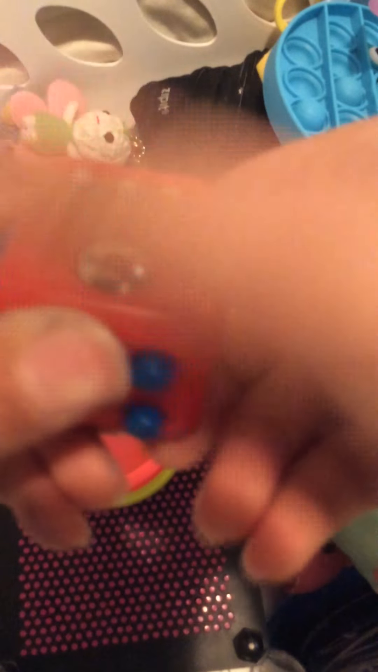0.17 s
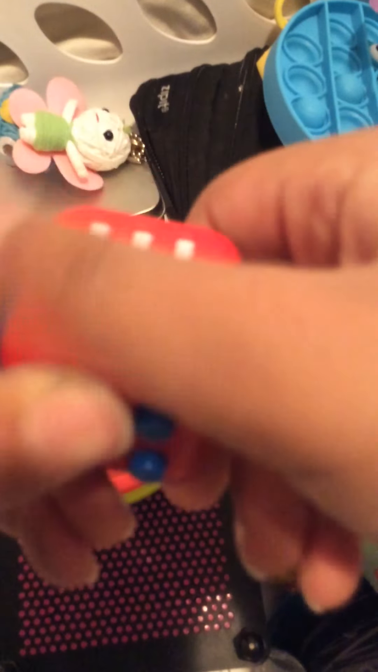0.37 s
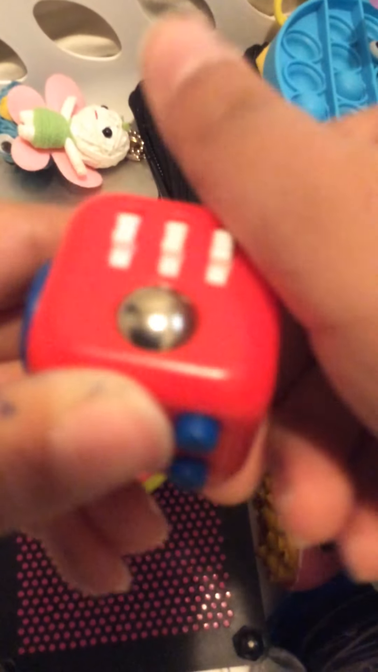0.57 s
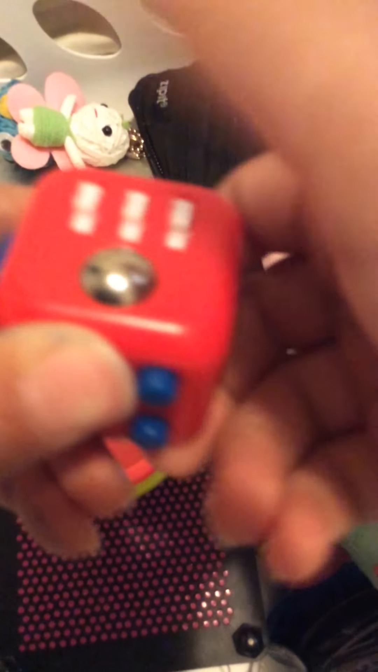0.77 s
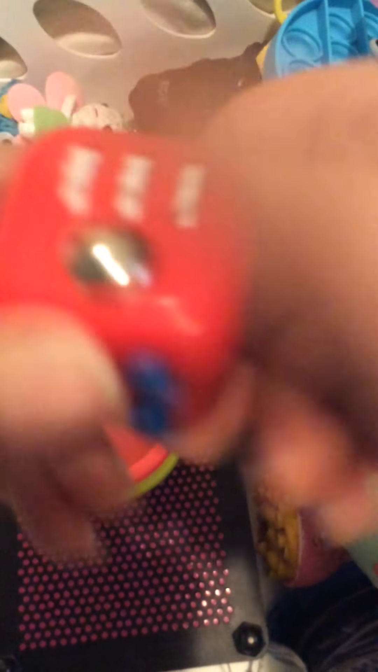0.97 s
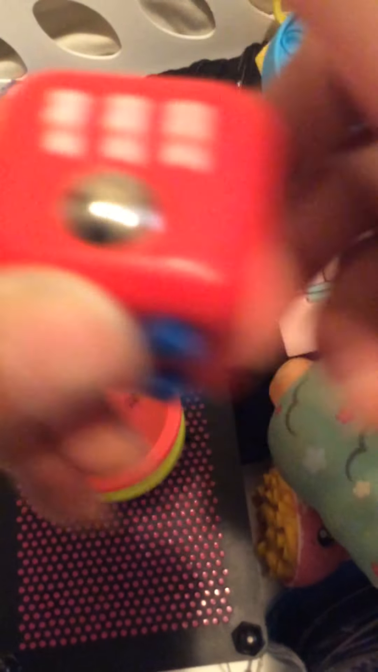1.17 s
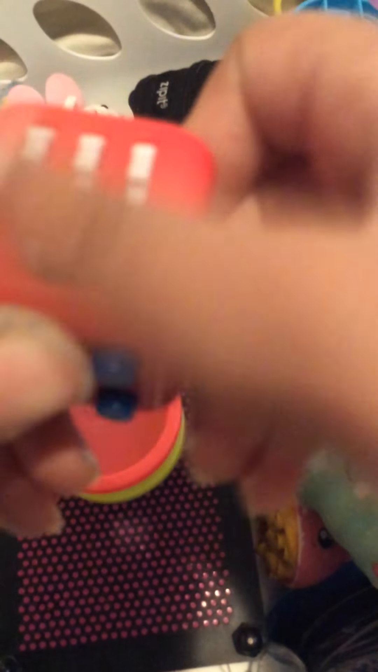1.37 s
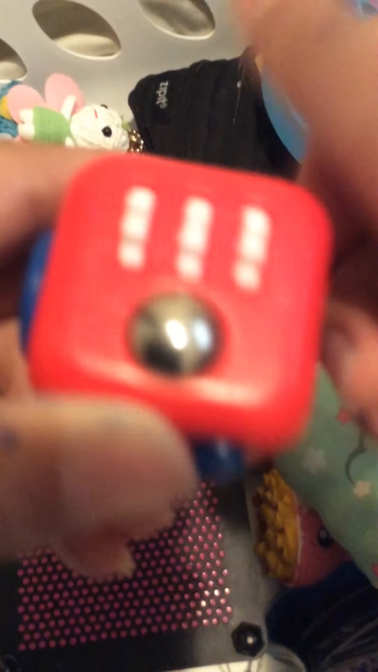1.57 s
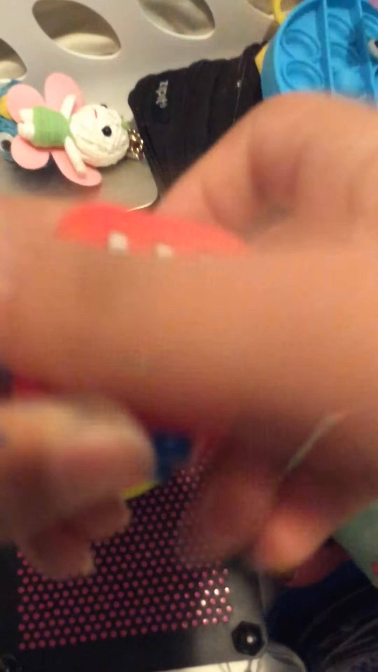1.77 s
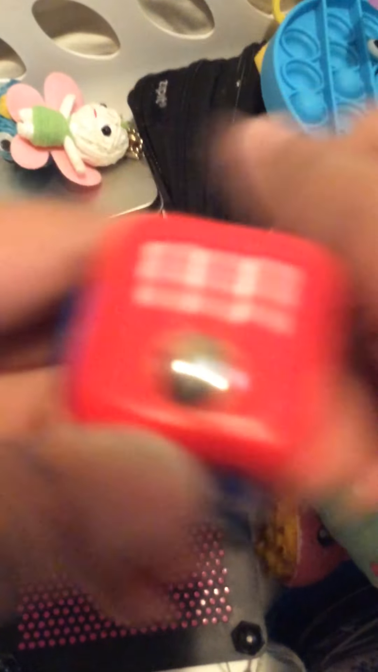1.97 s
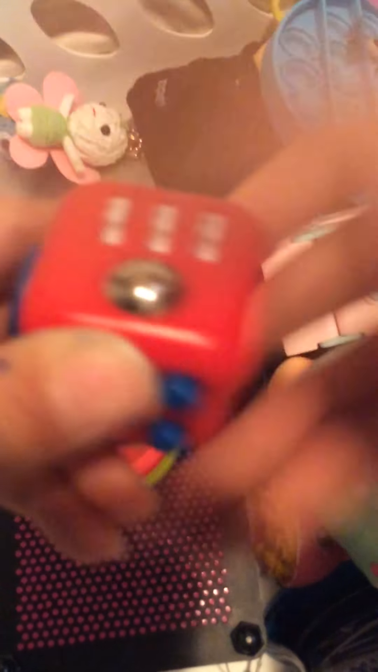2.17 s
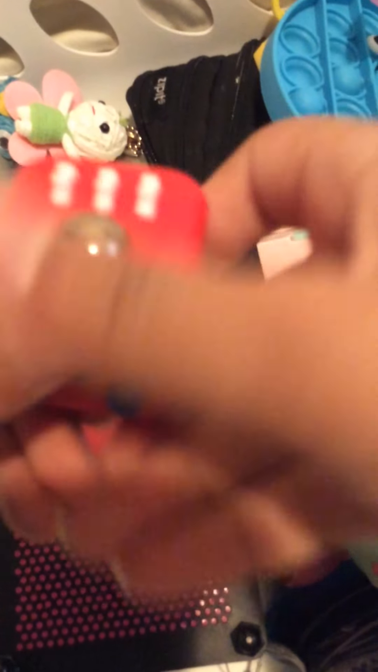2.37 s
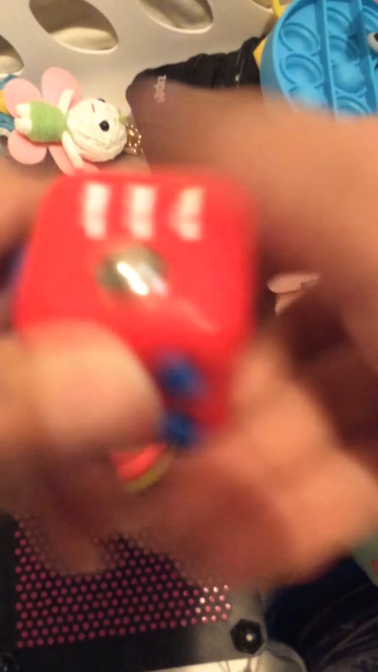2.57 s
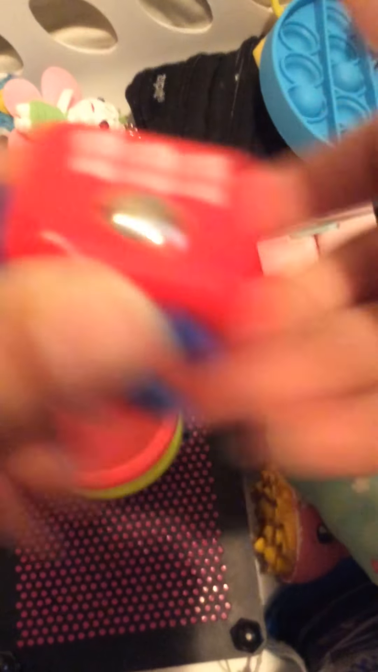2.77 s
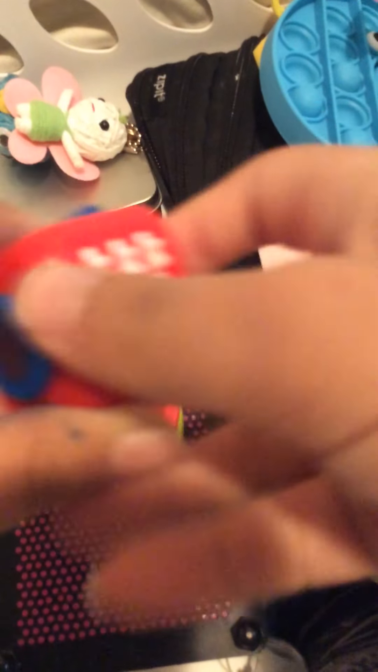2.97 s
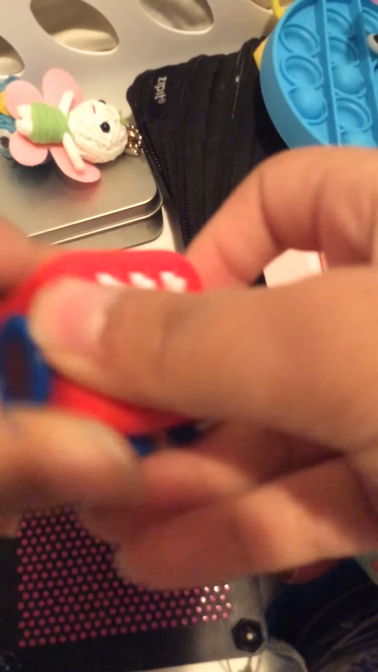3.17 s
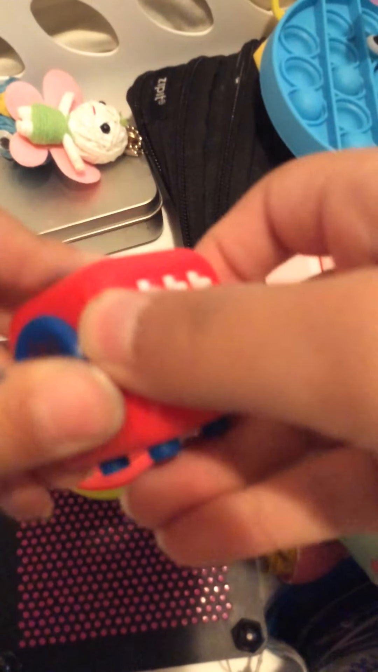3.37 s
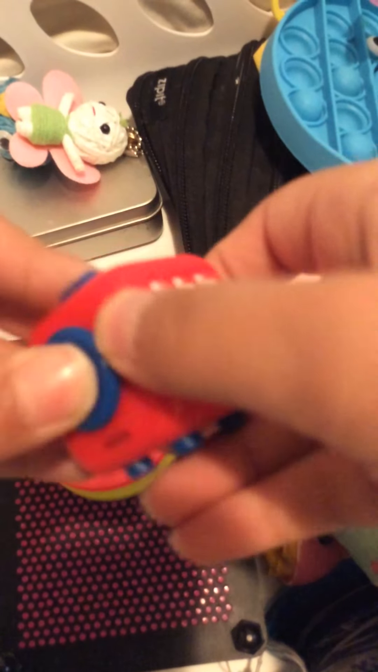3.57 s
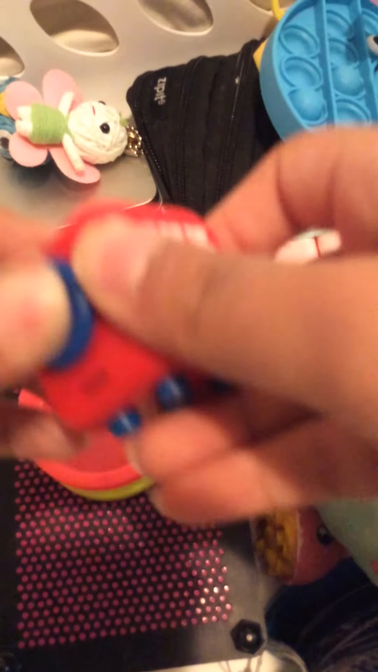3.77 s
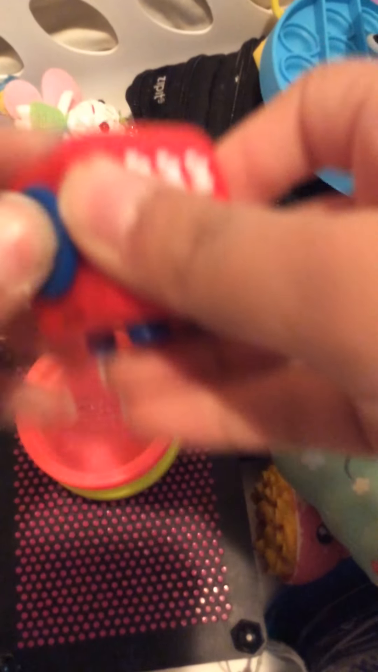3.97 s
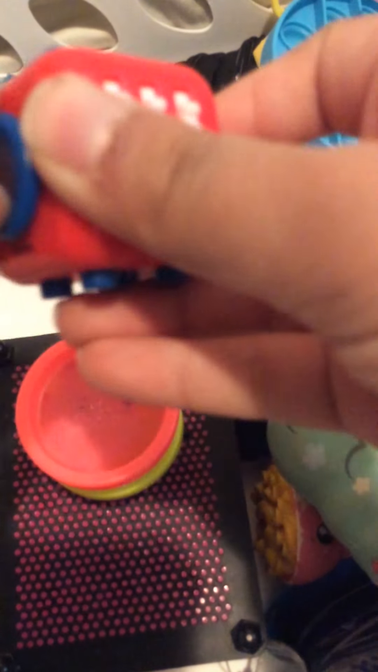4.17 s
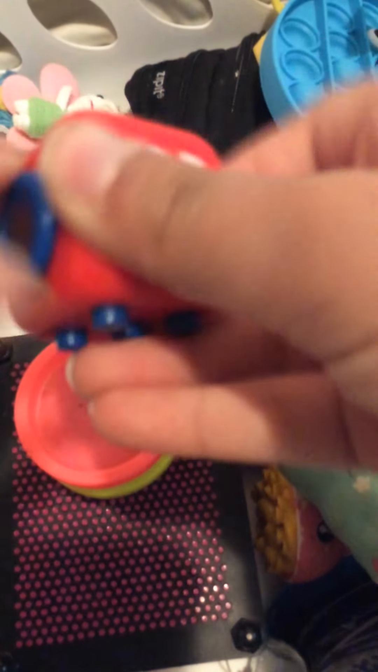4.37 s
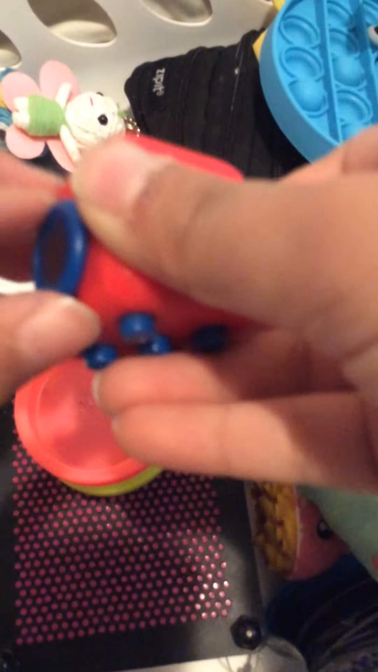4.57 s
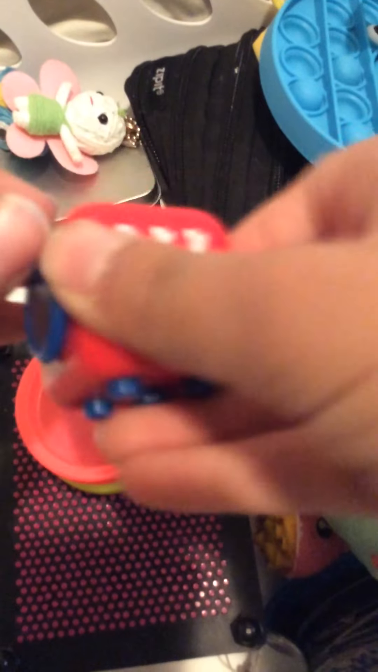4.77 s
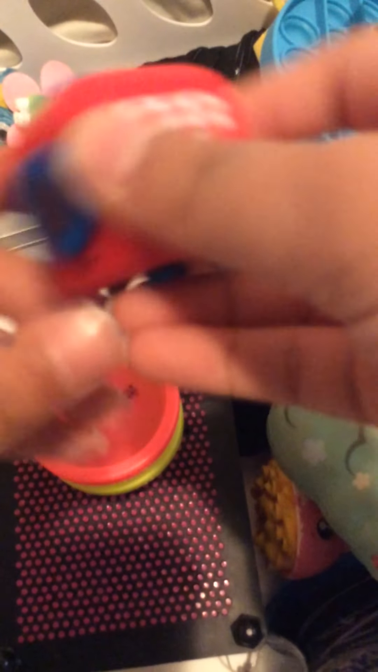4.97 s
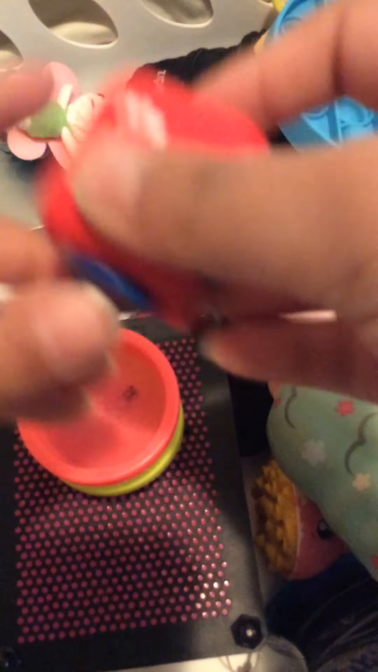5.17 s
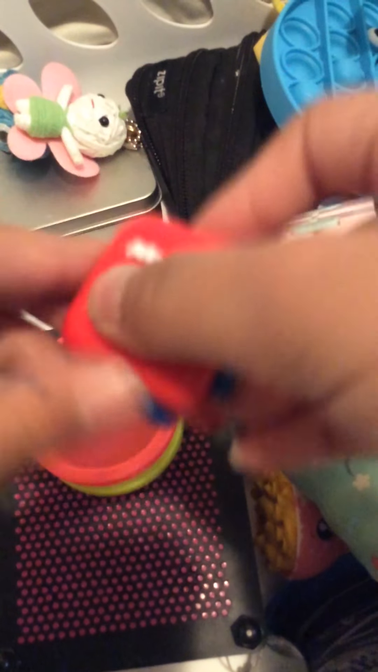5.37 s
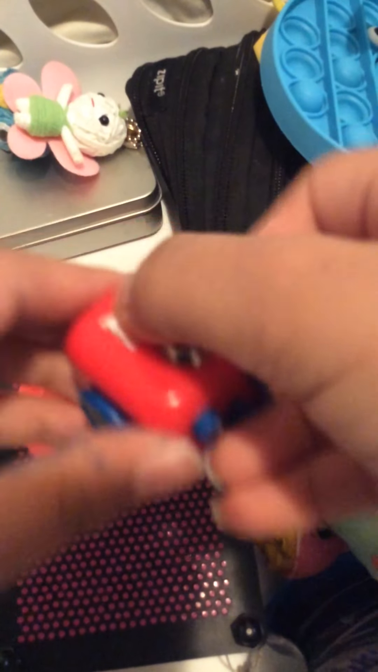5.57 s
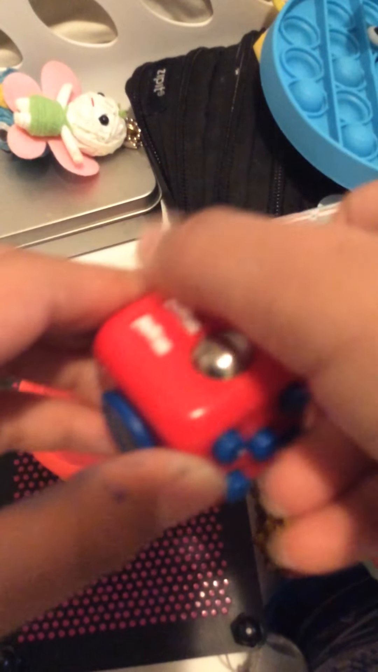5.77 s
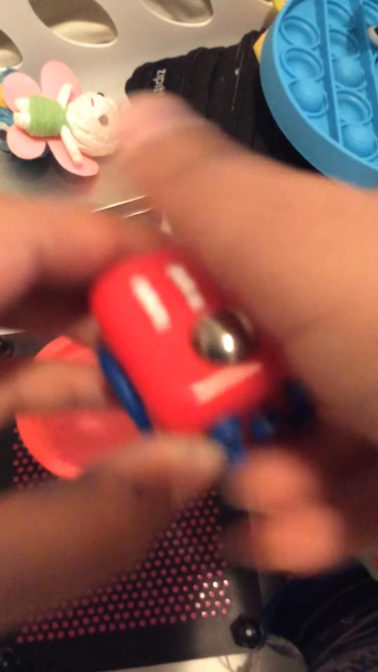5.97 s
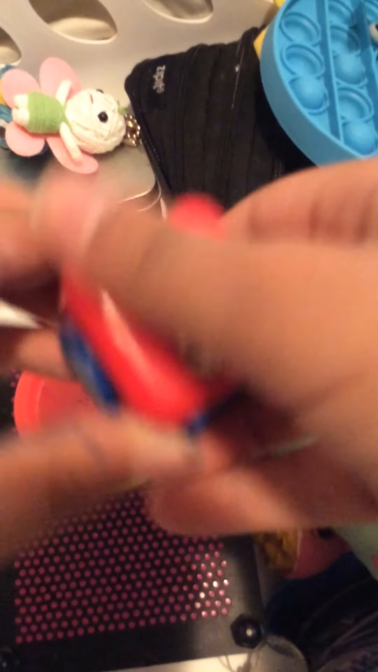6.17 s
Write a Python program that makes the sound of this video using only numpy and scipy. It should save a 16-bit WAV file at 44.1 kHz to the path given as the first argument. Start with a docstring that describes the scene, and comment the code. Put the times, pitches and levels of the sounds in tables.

```python
"""Fingers work a small hollow plastic cube with gears, a ball and buttons, close to a phone.
First a thumb sweeps the gears in loud ratchet bursts: runs of tiny contacts ring the cube's modes.
Then buttons and loose parts tick and rattle, mostly softer; fingertip knocks push the case throughout.
Behind it all lie the cube's faint room tail, shaped air noise and a low machine hum of noise bands
and a throbbing line."""
import sys
import numpy as np
from scipy import signal
from scipy.fft import rfft, irfft
from scipy.io import wavfile
from scipy.ndimage import uniform_filter1d

SR = 44100
rng = np.random.default_rng(int(sys.argv[2]) if len(sys.argv) > 2 else 0)


def to_wav(s):
    """Save 16-bit WAV."""
    ch = np.atleast_2d(s).T  # columns
    pcm = np.round(np.clip(ch, -1, 1) * 32767)  # PCM
    wavfile.write(sys.argv[1], SR, pcm.astype(np.int16))


N = 274743


def gain_of(db):
    """Decibels to amplitude gain."""
    return 10 ** (np.asarray(db) / 20)


def evened(x):
    """Scales to rms 1."""
    return x / np.sqrt(np.mean(x ** 2) + 1e-20)


def read(points, hz):
    """Interpolates (Hz, value) points on a log-frequency axis."""
    point_hz, value = np.transpose(points)
    return np.interp(np.log(hz + 1), np.log(point_hz + 1), value)


def add(mix, start_s, sound):
    """Mixes a sound in at start_s, cut at the end of the mix."""
    part = mix[max(round(start_s * SR), 0):][:len(sound)]
    part += sound[:len(part)]


def ring(part, at_s, size=768, spread_db=3, pitch_spread=.045):
    """A part's decaying modes after a tap; each tap lands elsewhere, so strength and pitch vary."""
    # Modes of the cube by part. Each row: frequency in Hz, relative level in dB, t60 in seconds.
    cube_modes = {"edges": [(7155, -4, .004), (8237, 1.5, .006), (8994, 2, .004), (10360, 1.5, 0.0034),
                  (10450, -4, 0.0046), (11870, -1.5, .004), (13700, -10.5, 0.0053), (13900, -8, 0.0018)],
                  "walls": [(3560, 0, 0.0014), (4496, 10, 0.01), (5373, 16, .008), (5648, -10, 0.0026)],
                  "cavity": [(1780, -8.5, 0.013), (1936, 2, 0.02), (2220, -3.5, 0.0036),
                  (2920, -6.5, 0.0046)], "case": [(407, -5, 0.0014), (780, 5.5, 0.012), (1030, 0, 0.032),
                  (1570, 2.5, 0.021)]}
    # The grip frees a wall mode once the cube is turned. Each row: time in seconds, boost in dB.
    grip = [(2.9, -4.5), (3.1, 2.5), (5.7, 9.5)]
    hz, db, t60_s = np.transpose(cube_modes[part])[:, :, None]
    level_chance, pitch_chance = rng.standard_normal((2, len(hz), 1))
    t = np.arange(size) / SR
    db = db + spread_db * level_chance
    if part == "walls":
        db[1] += np.interp(at_s, *np.transpose(grip))
    mode_hz = hz * (1 + pitch_spread * pitch_chance)
    decay = gain_of(db - 60 * t / np.maximum(t60_s, .001))
    modes = (decay * np.sin(2 * np.pi * mode_hz * t)).sum(0)
    # so small a body sends out little below its lowest mode
    highpass = signal.butter(4, .75 * hz.min(), "high", fs=SR, output="sos")
    return signal.sosfilt(highpass, modes)


def clicks(contacts_per_s=9000, swell_ms=3.2, swell_db=30, chatter_fall_db=11, snap=1.3):
    """A faint swell leads into each click; then it snaps and chatters in a dying run of tiny contacts that ring
    every part."""
    # Each row: crest in seconds, level of the bright edges in dB, cavity re edges in dB,
    # chatter in ms (time to fall by chatter_fall_db).
    click_rows = [(.01, -37.5, -21, 1.3), (.0344, -33, -17.5, 6.9), (.0392, -39.5, -14.5, 0.63),
                  (0.0474, -50, -11, 0.82), (.184, -42, -46, 1.1), (0.1912, -49.5, -12.5, 3.5),
                  (0.3233, -50.5, 1, 14), (.3936, -59.5, 7.5, 1.3), (.4258, -64.5, 9, 8),
                  (0.4772, -20.5, -3, 3.5), (.4994, -11, -5.5, 5.3), (0.506, -32, -8, 4.5),
                  (0.5154, -12, -24, 4.3), (.525, -11.5, -24, 5.1), (0.5315, -16, -23, 4),
                  (0.555, -40, -15, 3), (0.965, -48.5, 3, 2.1), (1.027, -21, -0.5, 2.9),
                  (1.041, -10, -11, 1.4), (1.045, -10, -17.5, 5.2), (1.0562, -19, -28, .6),
                  (1.06, -30, -4, 2.9), (1.0692, -15, -26, 1.3), (1.092, -48, -8, 5.3),
                  (1.099, -46.5, 1.5, 7.2), (1.11, -52.5, 7.5, 5), (1.3953, -42, -6.5, 1.4),
                  (1.4335, -55, -9, 2.2), (1.4955, -23, -24, 4.1), (1.4996, -14, -29, 1.6),
                  (1.504, -26, -9, 3.7), (1.51, -12, -20, 1.1), (1.5176, -10, -22.5, 1.1),
                  (1.523, -17, -19, 1.6), (1.5251, -13, -24, .8), (1.5276, -16, -31, 1.2),
                  (1.5321, -21, -24, 6), (1.5375, -19.5, -21, 2.7), (1.546, -26, -19, 1.5),
                  (1.5758, -43, -6, 9.6), (1.592, -40.5, -5, 9.1), (1.6487, -57, -4, 6.4),
                  (1.745, -69, 12.5, 4.2), (1.8786, -57, 5, 9.1), (1.911, -31, -22, 2.7),
                  (1.933, -40, -26, 4.3), (1.9581, -31.5, -17, 3.8), (1.983, -42, -19, 1.4),
                  (1.989, -36, -17, 1.9), (1.9927, -22, -25, 1), (1.9955, -25, -25, 1.5),
                  (1.998, -22, -22, 2.2), (2.0021, -12, -28, 0.34), (2.0034, -11.5, -27, 1.2),
                  (2.0056, -16.5, -36, 3.7), (2.0074, -18, -16.5, 3.1), (2.0457, -45, -1, 7.7),
                  (2.1743, -44.5, -17.5, 2.4), (2.2495, -56.5, -7, 9.2), (2.2753, -64.5, 13.5, 7.6),
                  (2.318, -67.5, -14.5, 1.26), (2.339, -59.5, 4, 5), (2.377, -60, 0, 1.7),
                  (2.4088, -61.5, -5, 2.2), (2.4273, -65.5, 0.5, 1.7), (2.499, -51.5, -17, 4.6),
                  (2.5146, -50, -27, 5.4), (2.5267, -36.5, -21, 2.2), (2.53, -37, -25.5, 2.6),
                  (2.542, -17, -17.5, 3), (2.558, -49.5, 5, 9.4), (2.6239, -30, -11, 8.4),
                  (2.6432, -18, -26.5, 3.2), (2.647, -30, -18, 2.1), (2.6529, -15.5, -19.5, 5.7),
                  (2.6647, -24, -28, 5.7), (2.672, -15, -16, 1.7), (2.7004, -34.5, -12, 3.3),
                  (2.711, -32.5, -9.5, 4.9), (2.7235, -51, 2.5, 6.9), (2.8392, -45.5, -29, 4.1),
                  (2.865, -35.5, -15, 1.6), (2.8693, -36, -28, 3.5), (2.884, -51.5, -10, 9.1),
                  (2.904, -64.5, 6.5, 2.1), (2.9941, -48, -11, 1.3), (3.0718, -35.5, -14.5, 1.4),
                  (3.121, -59.5, 14, 1.2), (3.1738, -62.5, 14, 1.26), (3.2186, -45, -14, 2.7),
                  (3.2334, -45, -9, 2.4), (3.2858, -48, -18, 1.8), (3.2918, -39.5, -13.5, 5.7),
                  (3.3145, -52, -17, 2.1), (3.3234, -51.5, -10.5, 3.7), (3.3992, -50, -0.5, 2.2),
                  (3.407, -50.5, 4, 1.6), (3.5111, -57, -1, 2.6), (3.5268, -51, -7, 3.1),
                  (3.5407, -60.5, 5, 1), (3.5603, -69, 18, 2.7), (3.5771, -35.5, -9, 2.3),
                  (3.5822, -53, 13, 1.5), (3.6426, -47.5, 7.5, 1.3), (3.7012, -44, -17, 3.3),
                  (3.936, -54, -10, 1.4), (3.9538, -53, -8, 1.9), (4.0487, -53.5, 4.5, 2.3),
                  (4.066, -38, -5.5, 7.1), (4.0767, -38, 3.5, 0.77), (4.0825, -36, -4.5, 3.5),
                  (4.098, -38.5, -32, 2.8), (4.138, -54.5, -2.5, 4.6), (4.1846, -59.5, 1.5, 1.8),
                  (4.274, -61.5, -21.5, 0.92), (4.329, -61, -2.5, 2.9), (4.4335, -53, -7.5, 5.3),
                  (4.4595, -60, 8, 1.9), (4.477, -57, 0.5, 2.8), (4.5438, -62.5, -5, 2.5),
                  (4.7727, -47, -15.5, 4.6), (4.7805, -47, 8, 2.7), (4.7875, -31, -21, 1.8),
                  (4.8016, -60.5, 8.5, 3), (4.861, -45, -16.5, 3.6), (4.9186, -55.5, 12, 6.4),
                  (4.9346, -38, -9, 7.1), (4.9455, -55, 6, 5.4), (4.9532, -47, -7.5, 3.4),
                  (4.9673, -53.5, 4.5, 5.2), (5.087, -61, -5, 2.3), (5.1118, -62.5, -18.5, 3.3),
                  (5.203, -54.5, -2.5, 2.3), (5.227, -53.5, 8.5, 4.6), (5.3365, -57, 1, 4.3),
                  (5.351, -47, -17, 2.8), (5.4424, -56, -5, 2.6), (5.455, -42.5, -16.5, 4.4),
                  (5.535, -53, -3, 7), (5.5784, -50, -19.5, 4.1), (5.6076, -45.5, -13.5, 3.5),
                  (5.6907, -61.5, -15.5, 1.4), (5.7148, -29, -19.5, 3.9), (5.7217, -44, -6.5, 3),
                  (5.7476, -34, -28, 2.9), (5.7557, -53, -3, 1.7), (5.8052, -39, -17, 4.1),
                  (5.814, -32.5, -18, 6.1), (5.8246, -55, -12, 3), (5.8494, -38, -28, 5.9),
                  (5.862, -46, -9, 1.9), (5.8888, -56, -6, 1.5), (5.9119, -42, -27, 4),
                  (5.9179, -25.5, -46, 2.9), (5.9274, -54, -8, 1.4), (6.0207, -51, -8, 1.6),
                  (6.081, -34, -39, 3.2), (6.1048, -52, -4, 5.2), (6.1312, -64.5, 10.5, 4.2),
                  (6.179, -50.5, -3.5, 1.1), (6.1996, -74, 15, 1.2)]
    # softer and hollower clicks sound more through the walls
    walls_db, walls_per_edges_db, walls_per_cavity_db = -7.5, -.15, .1
    # the case moves with the air in the cavity, and more in harder clicks
    case_db, case_per_edges_db = -12.5, .21
    out = np.zeros(N)
    ms = np.arange(700) / SR * 1000 - swell_ms
    for crest_s, edges_db, cavity_db, chatter_ms in click_rows:
        hit = rng.random(len(ms)) < contacts_per_s / SR
        contacts = rng.standard_normal(len(ms)) * hit
        contacts[np.argmin(abs(ms))] = snap
        rise_db = swell_db * ms / swell_ms
        fall_db = -chatter_fall_db * ms / max(chatter_ms, .3)
        contacts *= gain_of(np.where(ms < 0, rise_db, fall_db))
        re_edges_db = {
            "edges": 0,
            "walls": walls_db + walls_per_edges_db * edges_db + walls_per_cavity_db * cavity_db,
            "cavity": cavity_db,
            "case": cavity_db + case_db + case_per_edges_db * edges_db,
        }
        for part, part_db in re_edges_db.items():
            sound = signal.fftconvolve(contacts, ring(part, crest_s))
            # level = crest of a sine with the same energy over 200 samples
            crest = np.sqrt(sound @ sound / 100)
            add(out, crest_s - swell_ms / 1000, gain_of(edges_db + part_db) * sound / crest)
    return out


def knocks():
    """A soft fingertip pushes the case for a moment; the longer the push, the duller the knock."""
    # Each row: start in seconds, peak in dB, push in ms.
    knock_rows = [(.477, -34.5, 0.85), (.499, -28, 2.14), (.542, -39, .35), (1.027, -36, 1.4),
                  (1.039, -30, 0.57), (1.393, -47.5, 0.67), (1.499, -35, 0.29), (1.568, -45, 1.3),
                  (1.958, -52, 0.76), (2.005, -40, 0.6), (2.532, -38, 0.22), (2.697, -48.5, 1.4),
                  (3.231, -48.5, 0.96), (4.223, -47, 0.59), (4.779, -52, 1.3), (5.719, -51, .9),
                  (5.753, -51.5, 0.68)]
    out, ms = np.zeros(N), np.arange(200) / SR * 1000
    for start_s, peak_db, push_ms in knock_rows:
        push = np.sin(np.pi * np.clip(ms / max(push_ms, .1), 0, 1)) ** 2
        sound = np.convolve(push, ring("case", start_s))
        add(out, start_s, gain_of(peak_db) * sound / abs(sound).max())
    return out


def shaking(t, build_db=32.5, settle_db_per_s=500.5):
    """Rattle strength and its cavity share: strokes swell, hold, then the loose parts settle."""
    # Fingers sliding and shaking the cube. Each row: start of the hold in seconds, level in dB,
    # build-up in seconds (rise by build_db), hold in seconds, cavity re level in dB.
    strokes = [(0.003, -49, 0.15, 0.021, -20.5), (.08, -87.5, .05, 0.32, 7), (.1, -78, 0.044, 0.026, -14),
               (0.373, -57.5, 0.024, 0.016, -8.5), (0.423, -66.5, 0.037, 0.073, 1.5),
               (0.492, -30, 0.024, 0.022, -14), (0.536, -55, .02, 0.033, -12.5),
               (0.957, -54.5, 0.0083, 0.0098, 0), (1.014, -45.5, 0.015, 0.0092, -16),
               (1.038, -29.5, 0.018, 0.011, -11.5), (1.085, -56, 0.016, 0.023, -7.5),
               (1.392, -55.5, 0.016, 0.0044, -4.5), (1.454, -51, 0.032, 0.04, -14),
               (1.503, -28, 0.038, 0.024, -22), (1.569, -50.5, 0.03, 0.024, -2.5),
               (1.884, -55.5, .03, 0.093, -9.5), (1.997, -38.5, 0.014, 0.002, -12),
               (2.02, -51, 0.022, 0.044, -10.5), (2.159, -65, 0.09, 0.12, -11),
               (2.322, -73, 0.059, 0.14, -7), (2.511, -46, 0.045, 0.032, -17),
               (2.545, -55, .02, 0.024, -3.5), (2.63, -45, .03, 0.072, -7.5), (2.717, -66, .02, 0.037, -6),
               (2.821, -52.5, 0.034, 0.014, -16), (2.883, -67, .02, 0.02, -11.5),
               (3.208, -67, .06, .12, -2.5), (3.493, -65.5, 0.034, 0.088, -3),
               (3.618, -82, 0.043, 0.49, 5.5), (3.944, -80.5, .03, 0.035, -4.5),
               (4.068, -48, 0.022, 0.0088, -11), (4.129, -73, .03, 0.078, 0.5),
               (4.302, -89.5, 0.041, 0.25, 1.5), (4.432, -73.5, .03, 0.035, -7.5),
               (4.774, -56, 0.021, 0.013, -3), (4.916, -56.5, 0.048, .07, -10),
               (5.049, -69.5, 0.043, 0.051, -4.5), (5.212, -63, 0.064, 0.029, -16),
               (5.36, -64, 0.035, 0.06, -14), (5.447, -66, .03, 0.026, -11),
               (5.544, -60, 0.044, 0.04, -15.5), (5.72, -59, 0.11, 0.03, -7),
               (5.8, -61.5, 0.049, 0.056, -10), (5.898, -54.5, 0.021, 0.029, -15),
               (5.98, -68.5, .03, 0.045, -13), (6.089, -63.5, 0.053, 0.034, -4)]
    strength, hollow = np.full(N, 1e-6), np.full(N, 1e-6)
    for hold_at_s, db, build_s, hold_s, cavity_db in strokes:
        first = max(round((hold_at_s - build_s * 2) * SR), 0)
        near = slice(first, round((hold_at_s + hold_s + .2) * SR))
        late_s = t[near] - hold_at_s
        swell_db = build_db * np.minimum(late_s, 0) / max(build_s, .005)
        settle_db = settle_db_per_s * np.maximum(late_s - max(hold_s, 0), 0)
        shape = gain_of(db + swell_db - settle_db)
        strength[near] += shape
        hollow[near] += shape * gain_of(cavity_db)
    return strength, hollow / strength


def rattle(contacts_per_s=6000, uneven_db=3.0, clumpy_db=4.0, walls_db=-3, walls_power=0.085, spots=5):
    """Dense clumped contacts of uneven size on random spots, drawn anew every quarter second."""
    out, held = np.zeros(N), SR // 4
    strength, cavity = shaking(np.arange(N) / SR)
    clumps = uniform_filter1d(uniform_filter1d(rng.standard_normal(N), 200), 200)
    uneven = np.minimum(rng.exponential(1, N), 5)
    contacts = gain_of(uneven_db * uneven + clumpy_db * evened(clumps))
    contacts *= rng.choice([-1., 1.], N) * (rng.random(N) < contacts_per_s / SR)
    contacts = evened(contacts) * strength
    spot = rng.integers(0, spots, N)
    # the walls sound almost steadily with the edges, slightly more in hollow rattles
    shares = {"edges": np.ones(N), "walls": gain_of(walls_db) * cavity ** walls_power, "cavity": cavity}
    for part, share in shares.items():
        for at in range(0, N, held):
            now = slice(at, at + held)
            for k in range(spots):
                tap = ring(part, at / SR)
                on_spot = contacts[now] * share[now] * (spot[now] == k)
                add(out, at / SR, signal.oaconvolve(on_spot, tap / np.linalg.norm(tap)))
    return out


def room(x):
    """Sparse reflections of random sign, each band dying at its own speed; tail of unit energy."""
    # Each row: frequency in Hz, t60 in seconds.
    room_t60 = [(500, 0.28), (2000, 0.071), (6000, 0.14), (14000, 0.056)]
    taps = np.zeros(SR // 2)
    at = np.arange(100, len(taps) - 20, 10)
    taps[at + rng.integers(0, 10, len(at))] = rng.choice([-1., 1.], len(at))
    hz, t, spectra = signal.stft(taps, SR, nperseg=256)
    decay = gain_of(-60 * t / read(room_t60, hz)[:, None])
    tail = signal.istft(spectra * decay, SR, nperseg=256)[1]
    return signal.fftconvolve(x, tail / np.linalg.norm(tail))[:N]


def hum(line_hz=77.8, line_db=-62, depth=0.18, throbs_per_s=5.4, crest_s=0.13):
    """A far motor: narrow bands of noise and one steady-pitched line that throbs."""
    # Each row: centre in Hz, full width at half amplitude in Hz, level in dB rms.
    hum_bands = [(44, 15, -76.5), (84, 5.1, -69), (119.8, 2.5, -76.5), (198, 61, -76.5)]
    hz, t = np.fft.rfftfreq(N, 1 / SR), np.arange(N) / SR
    white = rfft(rng.standard_normal(N))
    out = np.zeros(N)
    for centre_hz, width_hz, db in hum_bands:
        band = irfft(white / (1 + (2 * (hz - centre_hz) / width_hz) ** 2), N)
        out += gain_of(db) * evened(band)
    throb = 1 + depth * np.cos(2 * np.pi * throbs_per_s * (t - crest_s))
    return out + gain_of(line_db) * throb * np.sin(2 * np.pi * line_hz * t)


def air(level_db=-67, patchy_db=2.5):
    """Room air and microphone hiss: random short-time spectra with slight patches, at level_db rms."""
    # Noise spectrum shape. Each row: frequency in Hz, relative density in dB per Hz.
    air_spectrum = [(59, -37), (100, -2), (150, -19), (308, -25), (547, -29), (662, -27.5), (784, -26.5),
                    (1520, -36), (2000, -39), (12000, -39), (16000, -45.5)]
    frames, hz = N // 256 + 5, np.fft.rfftfreq(1024, 1 / SR)
    real, imag, patches = rng.standard_normal((frames, 513, 3)).T
    # smoothed over 10 bins and 12 frames
    patches = evened(uniform_filter1d(uniform_filter1d(patches, 10, 0), 12, 1))
    spectra = (real + 1j * imag) * gain_of(read(air_spectrum, hz)[:, None] + patchy_db * patches)
    noise = signal.istft(spectra, nperseg=1024, noverlap=768)[1][:N]
    return gain_of(level_db) * evened(noise)


def scene(room_db=-22):
    """Cube, its room tail, air and hum, as one channel."""
    cube = clicks() + knocks() + rattle()
    return (cube + gain_of(room_db) * room(cube) + air() + hum())[None]


def record(dry, edge_hz=16300):
    """Microphone colour, a soft ceiling on the sharpest snaps, and a low-pass at edge_hz."""
    # Each row: frequency in Hz, gain in dB.
    mic_response = [(30, -11), (45, -1), (12500, 0), (16000, -9)]
    mic_gain = gain_of(read(mic_response, np.fft.rfftfreq(N, 1 / SR)))
    coloured = irfft(rfft(dry) * mic_gain, N)
    limited = coloured / (1 + coloured ** 12) ** (1 / 12)
    lowpass = signal.firwin(511, edge_hz, window=("kaiser", 9), fs=SR)
    return signal.oaconvolve(limited, lowpass[None], "same")


dry = scene()
out = record(dry)
to_wav(out)
```